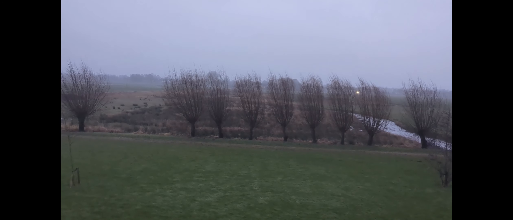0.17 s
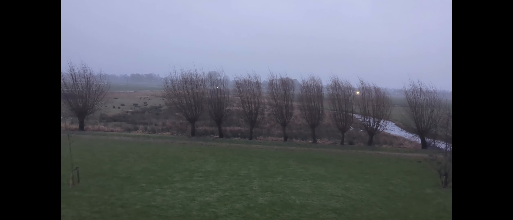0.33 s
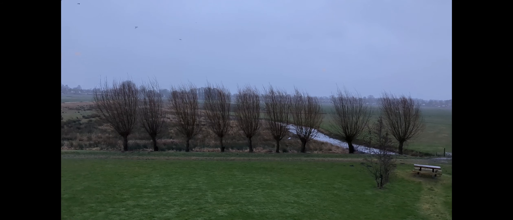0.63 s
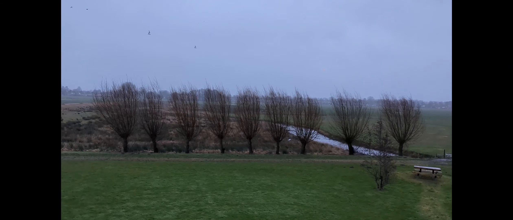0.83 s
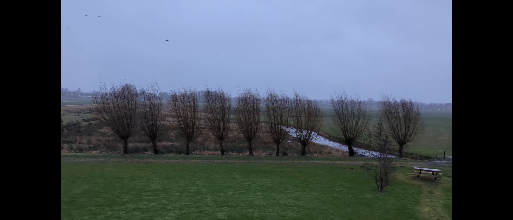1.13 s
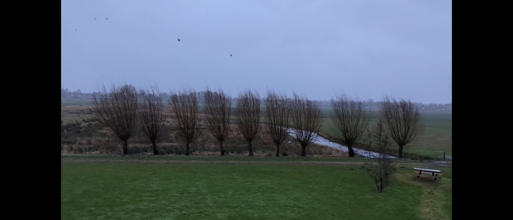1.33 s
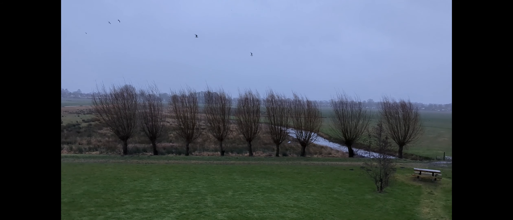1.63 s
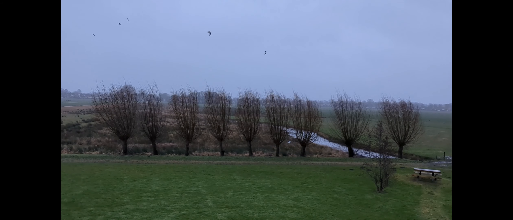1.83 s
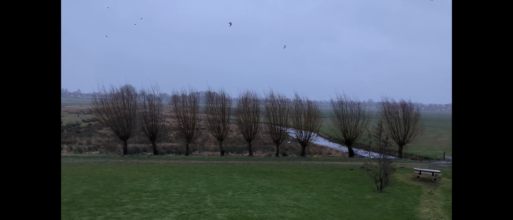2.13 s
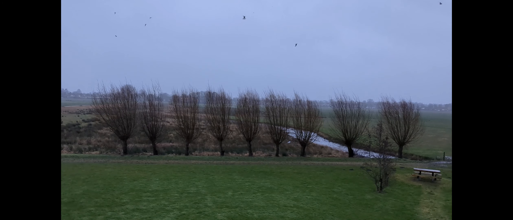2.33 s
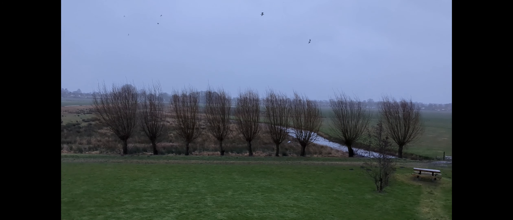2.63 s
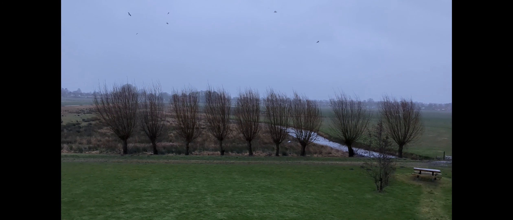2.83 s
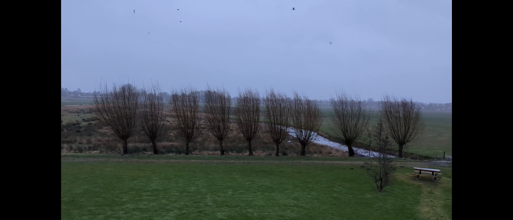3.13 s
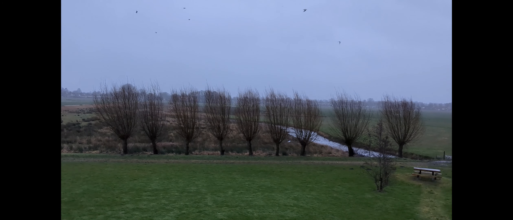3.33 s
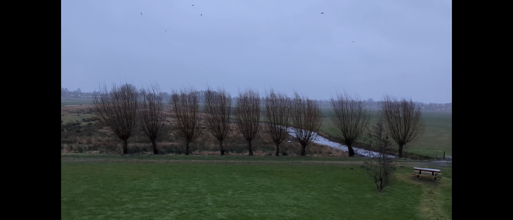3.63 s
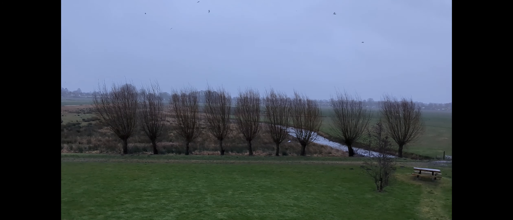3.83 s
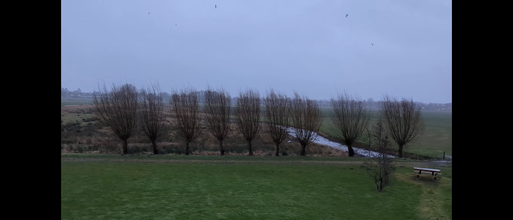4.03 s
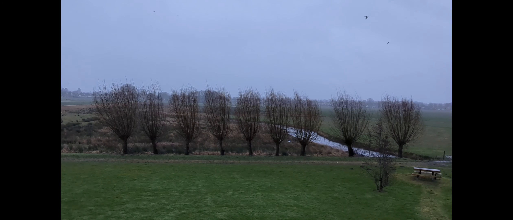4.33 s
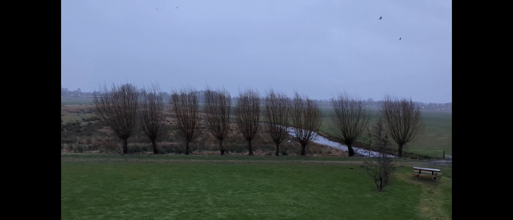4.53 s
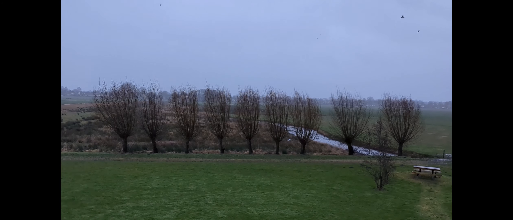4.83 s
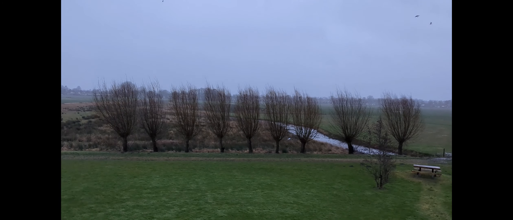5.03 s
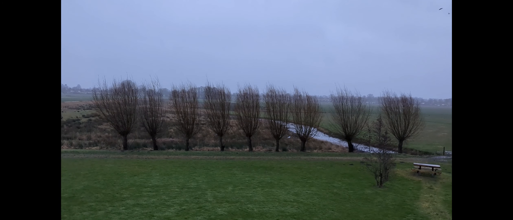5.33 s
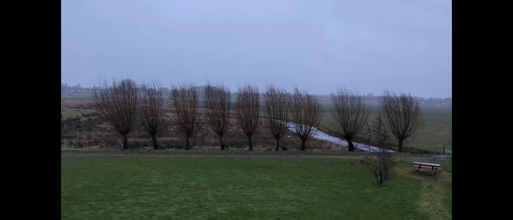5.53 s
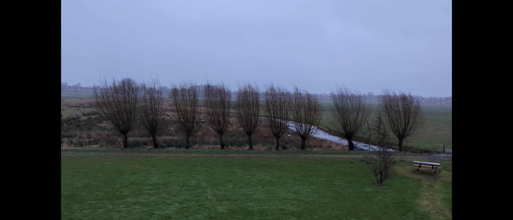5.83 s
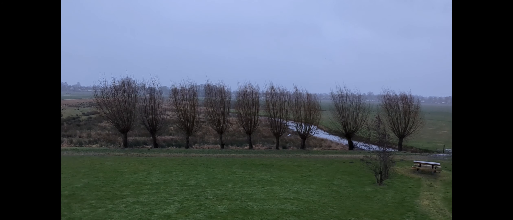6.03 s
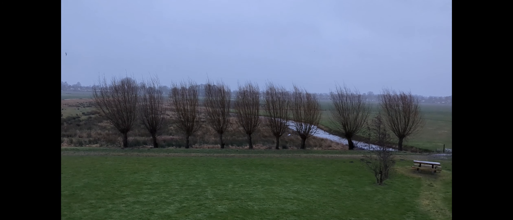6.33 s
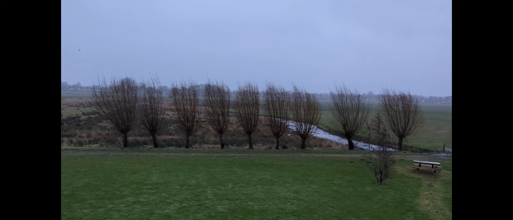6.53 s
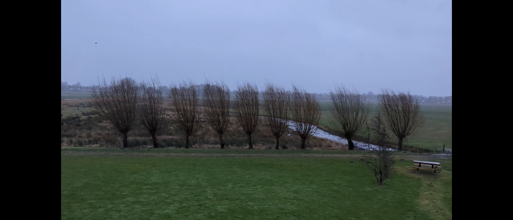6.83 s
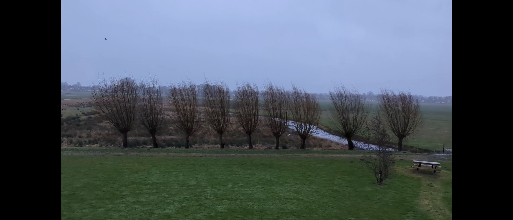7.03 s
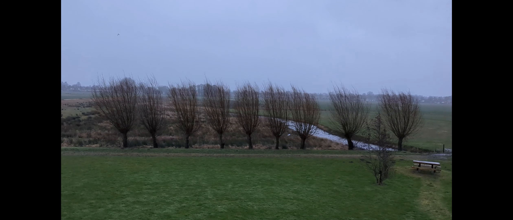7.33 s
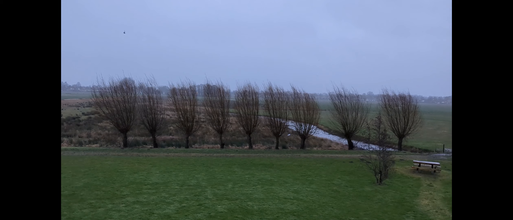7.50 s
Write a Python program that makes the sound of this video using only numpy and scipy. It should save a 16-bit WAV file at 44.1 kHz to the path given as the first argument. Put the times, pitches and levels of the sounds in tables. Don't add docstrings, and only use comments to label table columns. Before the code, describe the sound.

Quiet wind with a low knock on the left and a short wet tap on the right, then choppy dropouts into a strong gale. Deep gusts pummel the stereo microphone while a row of bare trees rushes behind. Thin hissing puffs, tiny gritty ticks and faint high whistles come and go, busiest from about five seconds, before the buffeting eases.

```python
import sys
import numpy as np
from scipy import signal
from scipy.fft import rfft, irfft, next_fast_len
from scipy.io import wavfile
from scipy.ndimage import uniform_filter1d

SR = 44100
rng = np.random.default_rng(int(sys.argv[2]) if len(sys.argv) > 2 else 0)


def store_pcm(level_fs):
    pcm = np.round(np.clip(level_fs, -1, 1) * 32767).astype(np.int16)
    wavfile.write(sys.argv[1], SR, np.atleast_2d(pcm).T)


def rack_gain(trim_db):
    fader = np.asarray(trim_db, float)
    return 10 ** (fader / 20)


N = 338015

# time_s, ports_db, trees_db
GALE_STRENGTH = [(0.68, -40, -54), (2.35, -39, -48), (3.09, -33.5, -46), (3.13, -32, -46),
                 (4.2, -37, -44.5), (4.24, -35, -44.5), (4.49, -36.5, -45), (5.19, -31, -42.5),
                 (5.35, -35, -45.5), (5.71, -31.5, -44), (5.75, -32, -44), (5.83, -34.5, -42.5),
                 (6.2, -33.5, -45.5), (6.26, -39.5, -42.5), (6.32, -35.5, -45), (7.0, -36.5, -45.5),
                 (7.35, -46, -44.5), (7.66, -43.5, -46.5)]
# peak_s, lower_jet_db, upper_above_lower_db, length_s
AIR_SPURTS = [(1, -74, -6, 0.021), (1.7, -74.5, -2, 0.04), (2.11, -78, -3, 0.037), (2.33, -68, -6, 0.01),
              (2.524, -68, -2, 0.06), (2.926, -73, 2, 0.016), (3.085, -67, -2, 0.012),
              (3.176, -65, -8, 0.069), (3.277, -78, 7, 0.015), (3.666, -72, 7, 0.022),
              (4.066, -67.5, -6, 0.045), (4.16, -75, 3, 0.012), (6.767, -63, -4, 0.08),
              (4.448, -66, 1, 0.03), (4.615, -63, -8, 0.017), (4.858, -56, -10, 0.015),
              (4.96, -59.5, -7, 0.12), (5.05, -57.5, -6, 0.036), (5.171, -57, -1, 0.021),
              (5.215, -54, 0, 0.018), (5.337, -59, -1, 0.059), (5.495, -60, 1, 0.056),
              (5.626, -61, -4, 0.069), (5.73, -59, -6, 0.033), (5.81, -59.5, 0, 0.068),
              (6.181, -62, -4, 0.035), (6.395, -65, 0, 0.058), (6.513, -61.5, 3, 0.03),
              (6.87, -60.5, -7.5, 0.04), (7.076, -62, -5.5, 0.0049)]


def evened(x):
    return x / np.sqrt(np.mean(x ** 2) + 1e-20)


def smooth(x, *sizes):
    for size in sizes:
        x = uniform_filter1d(x, size=size, axis=0)
    return evened(x)


def read(points, hz):
    f, *columns = np.transpose(points)
    return [np.interp(np.log(hz + 1), np.log(f + 1), c) for c in columns]


def add(mix, s, sound):
    part = mix[..., round(s * SR):][..., :sound.shape[-1]]
    part += sound[..., :part.shape[-1]]


def coloured(x, db_of):
    size = next_fast_len(x.shape[-1])
    gain = rack_gain(db_of(np.fft.rfftfreq(size, 1 / SR)))
    return irfft(rfft(x, size) * gain, size)[..., :x.shape[-1]]


def resonate_twice(x, hz, width_hz):
    turn = np.exp(2j * np.pi * np.cumsum(hz * np.ones(len(x))) / SR)
    r = np.exp(-np.pi * width_hz / SR)
    for _ in range(2):
        x = 2 * (turn * signal.lfilter([1 - r], [1, -r], x / turn)).real
    return evened(x)


def swells(t, rows):
    return sum((height * np.exp(-((t - s) / length) ** 2) for s, height, length in rows), 0 * t)


def wind_strength_db(t, strength, eddies, jets):
    # db_per_ports_db, db_per_trees_db
    follows = [
        (1.06, 0.1),
        (0.12, 1.0851),
        (0.29, 0.83),
        (0.81, 0.76),
    ]
    s, *winds = np.transpose(strength)
    db = np.array(follows) @ np.array([np.interp(t, s, c - c.mean()) for c in winds])
    db[0] += swells(t, eddies)
    db[3] += swells(t, [(s, 2.5, 1.08 * length) for s, _, _, length in jets])
    return db - 20 * np.log10(np.sqrt(np.mean(rack_gain(db) ** 2, axis=1, keepdims=True)))


def wind(strength, colour, ports, level_db, seconds, eddies, jets, patchy_db, gusty_db, lumpy_db):
    ranges_hz = [100, 600, 2300, 7000]
    frames, hz = int(seconds * SR) // 256 + 5, np.fft.rfftfreq(1024, 1 / SR)
    strength_db = wind_strength_db(np.arange(frames) * 256 / SR, strength, eddies, jets)

    share = np.array([np.interp(np.log(hz + 1), np.log(ranges_hz), row) for row in np.eye(4)]).T
    share[:, 3] *= 1 + .15 * np.clip(np.log2(hz / 7000 + 1e-9), 0, 1)

    a, b, c, d, patches = rng.standard_normal((frames, 513, 5)).T
    patches = evened(uniform_filter1d(uniform_filter1d(patches, size=12, axis=0), size=10, axis=1))
    gusts = smooth(rng.standard_normal(frames), 8)
    lumps = smooth(rng.standard_normal(frames), 5)
    treble = (hz / (hz + 2500))[:, None]
    bass = (300 / (hz + 300))[:, None]
    field_db = share @ strength_db + patchy_db * patches
    field_db += gusty_db * treble * gusts + lumpy_db * bass * lumps

    like, lead, lean_db = read(ports, hz)
    like = np.clip(like, 0, 1)
    tone = 1 / np.sqrt(1 + like * np.cos(lead))
    left = a + 1j * b
    right = (like * np.exp(1j * lead))[:, None] * left + np.sqrt(1 - like ** 2)[:, None] * (c + 1j * d)
    z = np.array([left * rack_gain(lean_db / 2)[:, None], right * rack_gain(-lean_db / 2)[:, None]])
    out = signal.istft(z * tone[:, None] * rack_gain(field_db), nperseg=1024, noverlap=768)[1][:, :N]
    out = coloured(out, lambda f: read(colour, f)[0])
    return rack_gain(level_db) * out / np.sqrt(np.mean(out.mean(axis=0) ** 2))


def calm_wind():
    # time_s, ports_db, trees_db
    strength = [(0, -61, -63.5), (.3, -63, -60), (.5, -61, -61.5)]
    # freq_hz, level_db (per Hz)
    colour = [(12, -47), (20, -8), (65, -1.5), (301, 0.5), (923, -7.5), (1090, -8.5), (1710, -7.5),
              (2200, -9.5), (3530, -21), (5080, -25), (16000, -64)]
    # freq_hz, likeness (0-1), right_lead_rad, left_over_right_db
    ports = [(60, .16, 0.11, 5), (290, 0.9, 0.33, 1.5), (700, 0.76, 0.38, -2), (1400, 0.1, 0.22, -4.5),
             (2400, .1, 0, -4), (4400, 0, 0.18, 8), (8000, .05, 0, 5.5), (15000, 0, 0.11, 27)]
    return wind(strength, colour, ports, -53.5, .6, [], [], patchy_db=1.2, gusty_db=.8, lumpy_db=1.2)


def knocks(rows):
    out, t = np.zeros(N), np.arange(SR // 4) / SR
    for s, hz, db, t60, rise, sign in rows:
        decay = rack_gain(db - 60 * t / t60)
        onset = 1 - np.exp(-t / rise)
        add(out, s, np.sign(sign) * decay * onset * np.sin(2 * np.pi * hz * t))
    return out


def hand_bumps():
    # start_s, pitch_hz, level_db, t60_s, rise_s, sign
    rings = [(.008, 290, -34.5, 0.051, .002, 1), (.013, 105, -36, 0.17, 0.0034, -1),
             (.038, 144, -33, 0.16, .01, 1), (.1195, 184, -15.5, 0.032, 0.01, -1),
             (.13, 98, -32, 0.049, 0.0045, 1)]
    return np.array([knocks(rings), np.zeros(N)])


def water_drop():
    # start_s, pitch_hz, level_db, t60_s, rise_s, sign
    rings = [(.4208, 1266, -7.5, 0.0057, 0.00085, -1), (.4209, 2920, -20, 0.0037, 0.00027, 1),
             (.4209, 4800, -34, 0.0044, 0.00034, 1), (.4209, 7200, -49, 0.0017, 0.00025, 1),
             (.4216, 266, -1, 0.0051, 0.00034, 1), (.4187, 56, -16.5, 0.073, 0.0052, -1)]
    return np.array([[rack_gain(-42)], [1]]) * knocks(rings)


def gale_wind():
    # freq_hz, level_db (per Hz)
    colour = [(25, -21), (31, -20.5), (42, -7), (60, -0.5), (184, -6.5), (310, -11), (480, -17),
              (1100, -26.5), (2540, -33.5), (4800, -44), (6400, -49), (9000, -60), (12000, -61.5),
              (16000, -71)]
    # freq_hz, likeness (0-1), right_lead_rad, left_over_right_db
    ports = [(60, .92, .08, 0), (260, .94, .2, -.4), (600, .77, .4, 0), (950, .45, .9, .5),
             (1290, .35, 2.2, 1.5), (1500, .58, 2.7, 1), (1800, .1, 1.2, 0), (2100, .28, 0, -.5),
             (2700, .2, -1.8, 0), (4300, .15, -3, -1.5), (4850, .2, -2.5, 4), (5600, .05, -3, 2),
             (8100, .05, -3, 5.5), (15000, 0, -3, 7)]
    # centre_s, buffeting_change_db, length_s
    eddies = [(1.686, 3, 0.033), (1.74, -6, 0.043), (1.815, 5.5, 0.018), (2.17, -2.5, .04),
              (2.263, 9, 0.0071), (2.492, 9, 0.031), (2.562, -4, .02), (2.958, 5, 0.02),
              (3.02, -4.5, 0.032), (3.157, 0.5, 0.034), (4.367, 4, 0.053), (4.483, -1, .03),
              (5.114, 3.5, 0.024), (5.132, 5, .015), (5.172, 3, 0.019), (5.263, 5, 0.013), (5.4, 0.5, .03),
              (5.434, 4.5, 0.027), (5.54, -5.5, 0.036), (5.632, 5.5, 0.024), (5.76, -3.5, 0.054),
              (6.202, 0.5, 0.0075), (6.263, -5, 0.016), (6.322, 1, 0.053)]
    return wind(GALE_STRENGTH, colour, ports, -35, N / SR, eddies, AIR_SPURTS,
                patchy_db=0.5, gusty_db=1.66, lumpy_db=-0.57)


def low_thumps():
    # start_s, pitch_hz, level_db, t60_s, rise_s, sign
    rings = [(.5465, 74, -39, .25, .003, 1), (.6728, 140, -39, .05, .001, 1)]
    return knocks(rings)


def gale_db(s, column):
    table = np.transpose(GALE_STRENGTH)
    return np.interp(s, table[0], table[column] - table[column].mean())


def small_spurts():
    per_s, level_db, db_per_gale_db, length_s = 5.5, -71, 1.3, .016
    gap, size, tilt, long = rng.random((80, 4)).T
    s = .8 + np.cumsum(.3 + 1.4 * gap) / per_s
    db = level_db + db_per_gale_db * gale_db(s, 1) + 9 * (size - .5)
    tilt_db = -5 + 12 * (tilt - .5)
    return np.transpose([s, db, tilt_db, length_s * (.7 + 0.55 * long)])[s < N / SR]


def spurts():
    wander, flutter = rng.standard_normal((N, 2)).T
    low_hz = 10500 + 500 * smooth(wander, 1500, 1500)
    modes = ((low_hz, 3200), (15000, 2600))
    jets = [resonate_twice(rng.standard_normal(N), hz, width) for hz, width in modes * 2]
    flow = np.zeros((2, N))
    for s, low_db, tilt_db, length in [*AIR_SPURTS, *small_spurts()]:
        u = np.arange(-2, 2, 1 / (SR * length))
        shape = np.exp(-(u / np.where(u < 0, .35, .75)) ** 2)
        mode_db = np.array([[low_db - 5.0], [low_db + tilt_db - 4.5]])
        add(flow, s - 2.14 * length, rack_gain(mode_db) * shape)
    flow *= rack_gain(3.9 * smooth(flutter, 150))
    left = flow[0] * jets[0] + flow[1] * jets[1]
    right = flow[0] * jets[2] + .4 * flow[1] * jets[3]
    return np.array([left, rack_gain(-10) * right])


def grit():
    # start_s, peak_db, centre_hz
    grains = [(1.8953, -59, 9950), (2.467, -60, 10100), (3.6593, -57, 13700), (4.9344, -50, 10900),
              (5.0312, -39, 9790), (5.0936, -52, 10600), (5.4727, -53, 10600), (5.6314, -52, 8780),
              (5.7925, -47, 12300), (6.1806, -48, 12100), (6.3662, -53, 11500), (6.5044, -54, 10700),
              (6.8855, -43, 9470), (7.0526, -52, 12100)]
    decay_s, rise_s, width_hz = 0.0027, .0007, 3500
    out, t = np.zeros((2, N)), np.arange(600) / SR
    shape = np.minimum(t / rise_s, 1) * np.exp(-t / decay_s)
    for s, db, hz in grains:
        hiss = resonate_twice(rng.standard_normal(600), hz, width_hz)
        port_db = db - 3.5 + np.array([[0], [-14]])
        add(out, s, rack_gain(port_db) * hiss * shape)
    return out


def whistles():
    # start_s, length_s, start_hz, end_hz
    glides = [(1.93, .035, 4290, 4300), (1.955, .03, 4280, 4620), (2.105, .06, 4300, 4340),
              (6.06, .05, 4700, 4760), (5.7, .05, 4700, 4740), (3.285, .04, 4720, 4940),
              (3.35, .035, 4720, 4940), (3.39, .04, 4950, 4760), (3.44, .06, 4760, 4650),
              (3.52, .035, 4900, 4900), (3.52, .03, 4540, 4530), (3.57, .05, 4860, 4800),
              (3.69, .04, 4880, 4900), (3.7, .09, 4560, 4530), (3.82, .05, 4520, 4600),
              (3.83, .03, 4340, 4340), (4.59, .04, 4650, 4750), (5.59, .05, 4970, 5020),
              (5.59, .06, 4700, 4780), (5.62, .05, 4350, 4350), (5.66, .03, 4720, 4900),
              (5.7, .05, 4800, 5000), (5.78, .03, 4800, 4780), (5.81, .05, 4740, 4960),
              (5.86, .06, 4820, 4700), (6.12, .035, 4650, 4760), (6.235, .025, 4780, 4780),
              (6.775, .075, 4800, 4580), (6.84, .04, 4680, 4350), (6.865, .055, 4330, 4280)]
    out = np.zeros((2, N))
    for s, length, start_hz, end_hz in glides:
        db, lean_db = -68, -8.5
        if start_hz >= 4470:
            db += 1.5 + 1.1 * gale_db(s, 2) + 11 * (start_hz - 4780) / 1000
            lean_db = 8
        hz = np.linspace(start_hz, end_hz, round(length * SR))
        waver, breath = rng.standard_normal((6000, 2))[:len(hz)].T
        hz = hz + 25 * smooth(waver, 300)
        skirt = resonate_twice(breath, hz, 320)
        tone = np.sqrt(2) * np.sin(2 * np.pi * np.cumsum(hz) / SR) * .75 + .95 * skirt
        port_db = db + np.array([[lean_db], [-lean_db]]) / 2
        add(out, s, rack_gain(port_db) * tone * signal.windows.tukey(len(hz), .6))
    return out


def scene():
    join = round(.52 * SR)
    air = np.concatenate([calm_wind()[:, :join], gale_wind()[:, join:]], axis=1)
    return air + hand_bumps() + water_drop() + low_thumps() + spurts() + grit() + whistles()


def microphone_db(hz):
    # centre_hz, width_hz, gain_db
    cavity = [(60.4, 28, 3), (2003, 420, 6), (5380, 1030, -7.5), (10200, 1100, 3), (13900, 800, -3.5),
              (15200, 1000, 6.5)]
    return sum(db / (1 + (2 * (hz - f) / width) ** 2) for f, width, db in cavity) - 90 * (hz > 15780)


def starved(x):
    # freq_hz, share_left (0-1), share_right (0-1)
    dropouts = [(4500, 0, 0), (5300, .005, .05), (6500, 0, .02), (11000, .01, .1), (13000, .07, .2),
                (14000, .2, .6), (14700, .02, .25), (16000, 0, .5)]
    hz, t, z = signal.stft(x, SR, nperseg=1024, noverlap=768)
    draw = rng.random((len(t) // 7 + 1, 65, 2)).T
    draw = draw.repeat(8, axis=1).repeat(7, axis=2)[:, :513, :len(t)]
    loud = uniform_filter1d(np.mean(abs(z[1]) ** 2, axis=0), size=60)
    need = np.array([np.ones(len(t)), np.clip(1.5 * loud / loud.mean(), .15, 1.3)])
    kept = draw > np.array(read(dropouts, hz))[:, :, None] * need[:, None]
    return signal.istft(z * np.where(kept, 1, .03), SR, nperseg=1024, noverlap=768)[1][:, :N]


def low_pass(x):
    return signal.sosfilt(signal.butter(12, 16830, fs=SR, output="sos"), x)


def record(dry):
    # time_s, gain
    cut = [(0, 1), (.5065, 1), (.5085, 0), (.531, 0), (.555, 1), (.56514, 1), (.56516, 0), (.67484, 0),
           (.67486, 1), (8, 1)]
    s, gain = np.transpose(cut)
    camera = starved(coloured(dry, microphone_db))
    mix = camera * np.interp(np.arange(N) / SR, s, gain)
    return low_pass(mix)


dry = scene()
out = record(dry)
store_pcm(out)
```